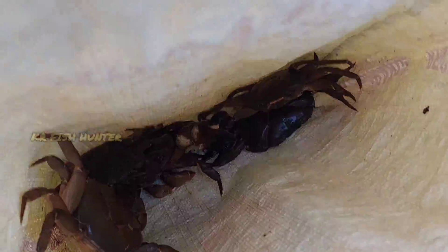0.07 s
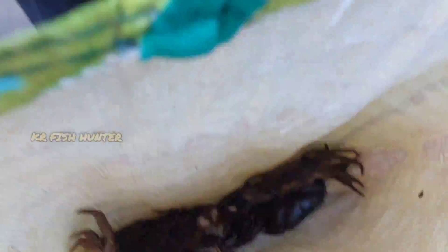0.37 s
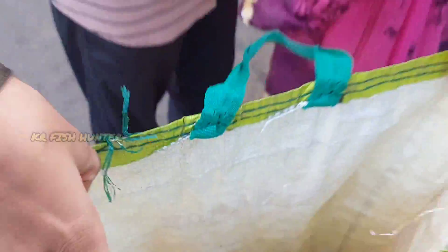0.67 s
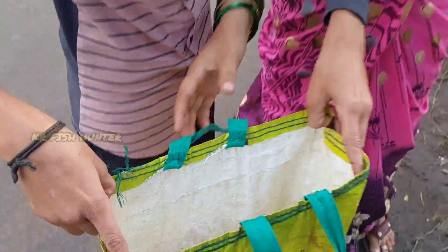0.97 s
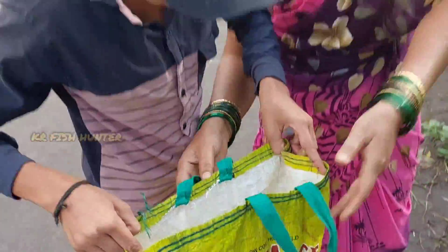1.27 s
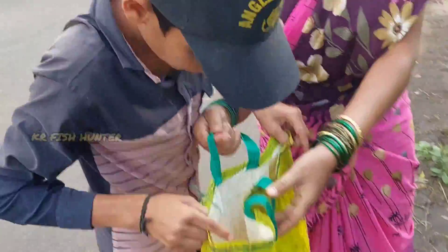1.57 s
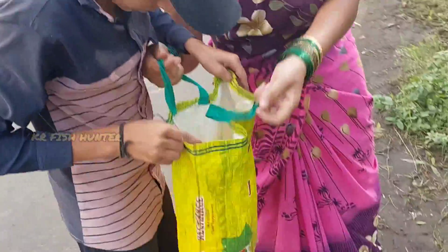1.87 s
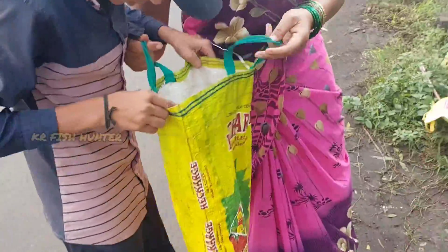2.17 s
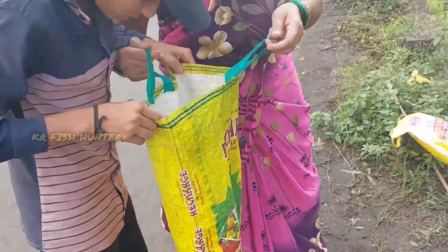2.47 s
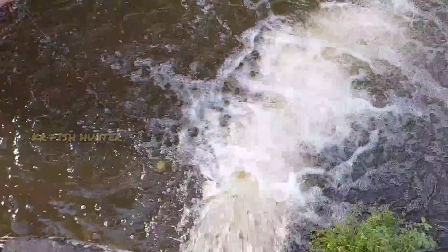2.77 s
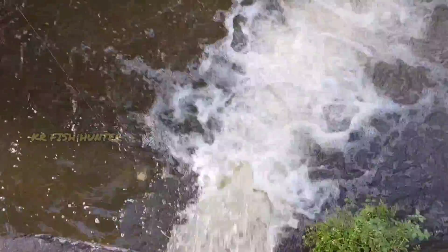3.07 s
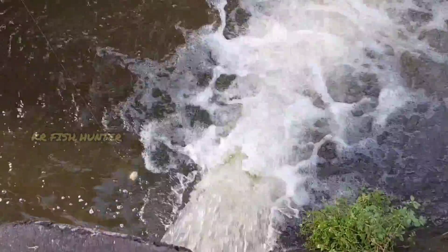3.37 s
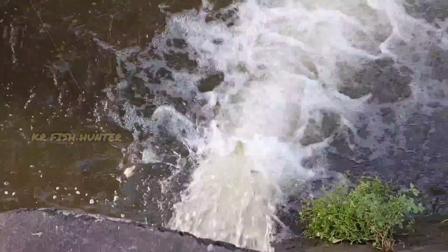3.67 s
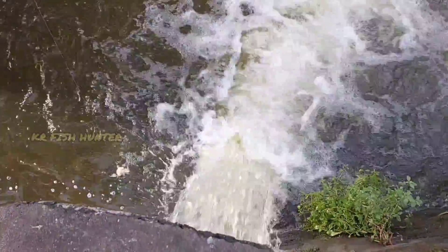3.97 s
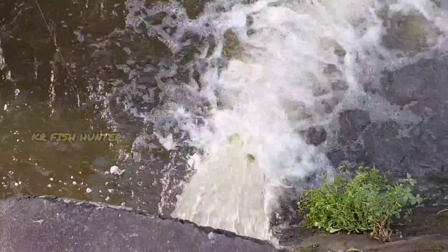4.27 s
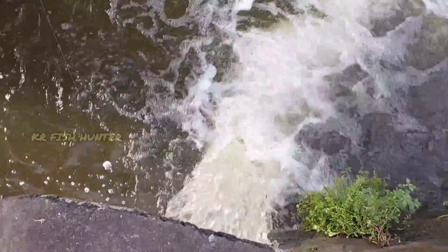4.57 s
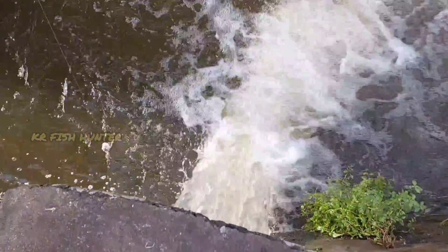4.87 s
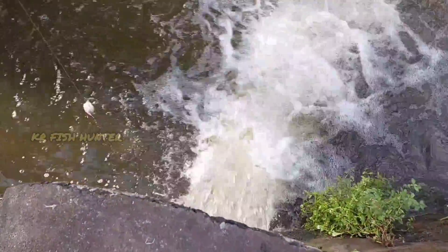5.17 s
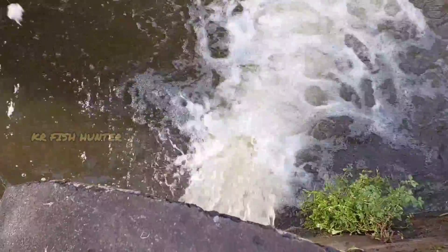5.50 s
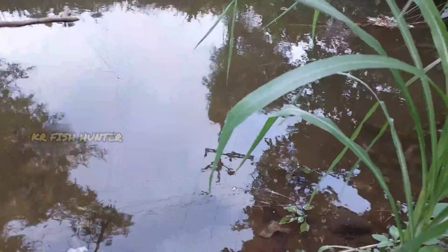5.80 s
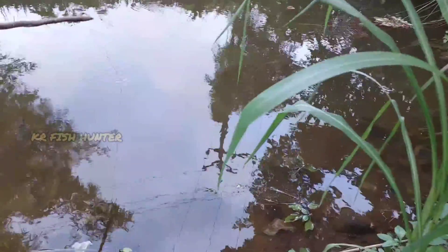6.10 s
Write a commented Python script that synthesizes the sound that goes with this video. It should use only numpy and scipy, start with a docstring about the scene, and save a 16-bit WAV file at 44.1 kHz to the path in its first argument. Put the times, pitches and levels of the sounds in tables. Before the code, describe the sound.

A woven plastic bag is handled with small snaps, a brief rustle and a few thin bangle clinks against a steady far-off rush. Suddenly a much louder stream of water plunges into a pool nearby, with gurgles, splashes and spray, and gusts buffet the microphone, mostly on the left. Finally the level drops to soft open air, a short grass swish and the faint, rapid chug of a distant engine.

```python
"""Outdoors, at three spots in turn. First, over a low distant rush, hands crinkle a woven plastic bag:
its stiff weave buckles in snaps, and glass bangles tick together. Then, close by, a thick jet gushes
from an outlet into a pool: trapped air booms, bubbles ring, spray hisses and wind thumps the microphone.
Last, a quiet pond, where grass brushes past and a far one-cylinder engine thuds out its exhaust."""
import sys
import numpy as np
from scipy import signal
from scipy.fft import rfft, irfft, next_fast_len
from scipy.io import wavfile
from scipy.ndimage import uniform_filter1d, map_coordinates

SR = 44100
rng = np.random.default_rng(int(sys.argv[2]) if len(sys.argv) > 2 else 0)


def dump_mix(stems):
    """Bounce the given channels to the path in sys.argv[1] as a 16-bit WAV at rate SR."""
    frames = np.atleast_2d(stems).T  # one column per channel
    limited = np.clip(frames, -1, 1)  # hard clip at full scale
    pcm = np.round(limited * 32767).astype(np.int16)
    wavfile.write(sys.argv[1], SR, pcm)


N = 279594

# how alike open air sounds at the two microphone ports: (frequency [Hz], likeness [0-1])
AIR_LIKENESS = [(50, 1), (140, 0.99), (600, 0.84), (1700, 0.72), (3500, 0.3), (7000, 0.073), (14000, .05)]
# the soft bed of air at the pond: (frequency [Hz], relative level [dB])
POND_TONE = [(20, -18), (90, 6), (180, 2.5), (350, -1), (650, -7.5), (1200, -11), (3200, -19.5),
             (6000, -19), (8300, -32), (12000, -28), (16000, -33)]
# a grass blade brushing past: (time [s], relative level [dB])
GRASS_BRUSHES = [(5.960, -42), (5.971, -42)]
# the thin swish of the blade: (frequency [Hz], relative level [dB])
GRASS_TONE = [(1200, -18), (2500, -8), (3900, -4), (4300, 1), (4800, -4), (8000, -20), (11500, -5),
              (16000, -12)]
# the breath of the engine's exhaust: (frequency [Hz], relative level [dB])
CHUFF_TONE = [(100, -20), (260, 0), (400, -2), (700, -14), (2000, -45)]

# the lows, mids and highs of the distant rush: (frequency [Hz], relative level [dB])
RUMBLE_TONE = [(20, -42), (60, -8.5), (88, -11.5), (140, 2), (180, -5), (230, -7), (300, -3), (420, -10.5),
               (620, -12), (850, -24.5), (2000, -45)]
WASH_TONE = [(300, -7), (900, 3), (1400, -0.5), (2200, -5.5), (3200, -15), (6000, -46)]
HISS_TONE = [(1200, -5), (3200, 1.5), (6300, 2), (8200, -9), (10000, -8), (12000, -3.5), (16000, -11.5)]
# the air resonating inside the open bag: (frequency [Hz], relative level [dB])
HOLLOW_TONE = [(180, -5), (275, 10), (400, -33), (560, 0), (670, 1.5), (850, -24), (1500, -32)]
# the bag's wall muffling the rumble: (frequency [Hz], gain [dB])
BAG_WALL_EQ = [(150, 0.5), (220, -3), (420, -3), (900, -6)]

# wind buffeting the microphone: (frequency [Hz], relative level [dB])
BUFFET_TONE = [(15, -44), (48, 11.5), (70, 0.5), (110, -1.5), (300, -9.5), (1000, -70)]
# the breeze freshening on the left port at the outlet: (time [s], level [dB])
WINDWARD_BREEZE = [(2.8, -44), (3.4, -36.5), (4.0, -29.5), (5.1, -29), (5.35, -30)]
# single gusts: (middle [s], length [s], left level [dB], right level [dB])
WIND_GUSTS = [(0.146, .14, -29, -30), (1.85, 0.96, -38.5, -35), (2.91, 0.085, -26, -42),
              (4.406, 0.1, -21, -55), (4.716, 0.1, -22, -26), (5.46, 0.1, -13.5, -36),
              (5.566, .26, -14.5, -20)]

# the bag's weave buckling: (time [s], relative snap level [dB], relative tick level [dB])
BAG_CRINKLES = [(0.5093, -40, -50), (1.565, -36, -36.5), (1.6246, -36.5, -42), (1.737, -32.5, -35),
                (1.863, -42, -50), (1.989, -37, -55), (2.107, -35, -60), (2.219, -41, -36),
                (2.457, -33.5, -44), (2.5503, -33.5, -43)]
# a crinkle's snap and the crisp tick on top: (frequency [Hz], relative level [dB])
SNAP_TONE = [(300, 6), (900, 5.5), (1600, 4), (3500, -4), (5500, -7.5), (8500, -36)]
TICK_TONE = [(2000, -19), (4000, 3), (6000, 0), (8300, -9), (12000, -6), (16000, -6)]
# the weave rustling as the bag's mouth is pulled shut: (middle [s], length [s], level [dB])
BAG_RUSTLES = [(1.73, 0.16, -38)]
# glass bangles touching: (time [s], relative level [dB])
BANGLE_TAPS = [(.55, -44), (.77, -45), (1.325, -37), (1.347, -41), (2.615, -41), (2.638, -42)]
# the thin ring of the glass: (frequency [Hz], relative level [dB])
GLASS_TONE = [(10000, -45), (11450, -14), (11750, -8), (12100, -12), (14000, -35)]

# air pockets booming in the pool, and spray landing on it: (frequency [Hz], relative level [dB])
PLUNGE_TONE = [(25, -54), (60, -4), (90, -10), (132, 3), (175, -5), (230, -6), (305, -1.5), (400, -11),
               (520, -5.5), (670, -11), (850, -9), (1300, -14), (2000, -17), (4000, -34.5)]
SPRAY_TONE = [(700, -15), (1800, 0.5), (3000, 0.5), (5500, 0.5), (6800, -3.5), (8200, -11), (10000, -9),
              (12500, -7), (16000, -17.5)]
# lumps of water slapping the pool: (time [s], level [dB])
WATER_SLAPS = [(3.389, -28), (3.7369, -24), (4.0274, -24), (4.8434, -23.5), (4.9711, -20), (4.9814, -20),
               (5.236, -24)]
# the smack of one lump: (frequency [Hz], relative level [dB])
SLAP_TONE = [(300, -21), (1200, -1), (2600, -6), (4500, -7), (9000, -24), (16000, -24)]
# how alike the jet sounds at the two ports: (frequency [Hz], likeness [0-1])
JET_LIKENESS = [(50, 0.58), (140, 1), (350, 1), (1000, 0.71), (2200, 0.56), (4000, 0.58), (6500, 0.51),
                (10000, 0.18), (15000, .1)]
# the right port ringing in two broad bands: (frequency [Hz], gain [dB])
PORT_RING_EQ = [(100, -0.5), (600, 1), (1600, -1), (2700, -3), (4100, 5.5), (5200, 5.5), (6200, 0.5),
                (8800, 3.5), (11600, 14), (16000, 9.5)]
# how much of that ring is heard as the hand cupped over the port shifts: (time [s], share [0-1])
PORT_RING_MIX = [(2.8, 0.8), (3.05, 1), (5.2, 1), (5.45, 0.82)]

# when each spot is heard: (start [s], end [s])
AT_BAG, AT_OUTLET, AT_POND = (-.01, 2.733), (2.781, 5.666), (5.668, 6.4)


def amp(db):
    """Decibels to gain."""
    return 10 ** (np.asarray(db) / 20)


def unit(x):
    """Scaled to rms 1."""
    return x / np.sqrt(np.mean(x ** 2) + 1e-20)


def along(points, hz):
    """Reads (frequency [Hz], value) points on a log axis."""
    f, v = np.transpose(points)
    return np.interp(np.log(hz + 1), np.log(f + 1), v)


def automation(points):
    """A fader ride through (time [s], value) points."""
    return np.interp(np.arange(N) / SR, *np.transpose(points))


def ramp(start_s, end_s):
    """A straight rise from 0 to 1."""
    return automation([(start_s, 0), (end_s, 1)])


def gate(span, fade_s):
    """Open over (start [s], end [s]), with a fade at each edge."""
    t = np.arange(N) / SR
    return np.clip(np.minimum(t - span[0], span[1] - t) / fade_s + .5, 0, 1)


def swells(rows):
    """An envelope of smooth arches: (middle [s], length [s], level [dB])."""
    t = np.arange(N) / SR
    return sum(amp(db) * np.cos(np.pi * np.clip((t - s) / length, -.5, .5)) ** 2
               for s, length, db in rows)


def wobble(rate):
    """A smooth random curve with rate points a second."""
    return map_coordinates(rng.standard_normal(int(N * rate / SR) + 4), [np.arange(N) * rate / SR])


def filtered(x, response):
    """x through a gain given as a function of frequency."""
    size = next_fast_len(N + SR // 4, real=True)
    return irfft(rfft(x, size) * response(np.fft.rfftfreq(size, 1 / SR)), size)[..., :N]


def eq(x, tone):
    """x through an EQ curve: (frequency [Hz], gain [dB])."""
    return filtered(x, lambda hz: amp(along(tone, hz)))


def noise(patchy_db):
    """Two white noises sharing patches of random gain in time and frequency."""
    spectra = signal.stft(rng.standard_normal((2, N)), nperseg=512)[2]
    patches = uniform_filter1d(rng.standard_normal(spectra.shape[1:]), size=6, axis=0)
    patches = unit(uniform_filter1d(patches, size=8, axis=1))
    return unit(signal.istft(spectra * amp(patchy_db * patches), nperseg=512)[1][:, :N])


def at_ports(pair, likeness, lag_ms):
    """Two unrelated signals become one wide source of rms 1 that reaches the left port later."""
    size = next_fast_len(N + SR // 4, real=True)
    hz = np.fft.rfftfreq(size, 1 / SR)
    width = np.arccos(np.clip(along(likeness, hz), -1, 1)) / 2
    mid, side = rfft(pair, size) * [np.cos(width), np.sin(width)]
    half_delay = np.exp(-1j * np.pi * hz * lag_ms / 1000)
    ports = np.array([(mid + side) * half_delay, (mid - side) / half_delay])
    return unit(irfft(ports, size)[:, :N])


def bursts(hits, tone, attack_s, t60_s):
    """Stereo puffs of shaped noise that swell and die, one per (time [s], level [dB])."""
    t = np.arange(SR // 4) / SR
    shape = (1 - np.exp(-t / attack_s)) * amp(-60 * t / t60_s)
    envelope = np.zeros(N + SR)
    for s, db in hits:
        envelope[round(s * SR):][:len(t)] += amp(db) * shape / shape.max()
    return envelope[:N] * unit(eq(rng.standard_normal((2, N)), tone))


def clicks(rate, spread_db):
    """Two streams of tiny impacts of uneven size."""
    count = int(rate * N / SR)
    sizes = amp(spread_db * np.clip(rng.standard_normal((2, count)), -2, 2))
    sizes *= rng.choice([-1, 1], (2, count))
    return unit(np.array([np.bincount(rng.integers(0, N, count), row, N) for row in sizes]))


def air_bed(tone, patchy_db, lag_ms):
    """A bed of open-air noise, narrow in the lows and wide in the highs."""
    return at_ports(eq(noise(patchy_db), tone), AIR_LIKENESS, lag_ms)


def engine():
    """One far cylinder at an even speed: each firing puffs exhaust, then the silencer rings briefly."""
    first_s, firing_hz, jitter_s = 5.6923, 17.16, 0.00079
    puff_hz, puff_width_s, delay_s = 185, 0.0029, 0.00513
    ring_hz, ring_t60_s = 178, 0.16
    firings = [(s + jitter_s * rng.standard_normal(), -33.5 + 2 * rng.standard_normal())
               for s in np.arange(first_s, N / SR, 1 / firing_hz)]
    t = np.arange(N) / SR
    thuds = np.zeros(N)
    for s, db in firings:
        age = t - s - delay_s
        puff = np.exp(-(age / puff_width_s) ** 2 / 2) * np.cos(2 * np.pi * puff_hz * age)
        ring = np.sin(2 * np.pi * ring_hz * age) * amp(-60 * np.abs(age) / ring_t60_s) * (age > 0)
        thuds += amp(db) * (puff + amp(-6) * ring)
    chuff = bursts(firings, CHUFF_TONE, attack_s=.004, t60_s=.08)
    return thuds + amp(-19.5) * chuff


def pond():
    """Soft open air, and a grass blade brushing past on the right."""
    air = air_bed(POND_TONE, patchy_db=0.5, lag_ms=0.41)
    grass = bursts(GRASS_BRUSHES, GRASS_TONE, attack_s=.006, t60_s=0.04)
    return amp(-48) * air + amp([[-13], [-4]]) * grass


def distant_rush():
    """Churning rumble, wash and thin hiss far to the right, heard at first from the bag's hollow mouth."""
    outside = ramp(.58, .92)  # the microphone backs out of the bag
    screened = 1 - ramp(1.12, 1.72)  # then clear of the people who screen it
    rumble = air_bed(RUMBLE_TONE, patchy_db=1.66, lag_ms=0.37)
    rumble = outside * rumble + (1 - outside) * eq(rumble, BAG_WALL_EQ)
    wash = air_bed(WASH_TONE, patchy_db=1.65, lag_ms=0.43)
    hiss = air_bed(HISS_TONE, patchy_db=2.0, lag_ms=0.455)
    hollow = air_bed(HOLLOW_TONE, patchy_db=-0.1, lag_ms=0.28)
    return (amp(-30 - 0.6 * wobble(rate=14)) * rumble
            + amp(-35.5 - 4.5 * screened) * wash
            + amp(-44.5 - 1.6 * screened) * hiss
            + amp(-34.5 - 16 * outside) * hollow)


def wind(left_db, right_db):
    """A breeze fluttering with turbulence and single gusts thump each port separately."""
    breeze = np.array([amp(db + 3 * wobble(rate=13)) for db in (left_db, right_db)])
    gusts = np.array([swells([(s, length, db) for s, length, db, _ in WIND_GUSTS]),
                      swells([(s, length, db) for s, length, _, db in WIND_GUSTS])])
    return unit(eq(rng.standard_normal((2, N)), BUFFET_TONE)) * np.hypot(breeze, gusts)


def bangles():
    """Glass touches glass with a high, thin ring."""
    return amp(-7.5) * bursts(BANGLE_TAPS, GLASS_TONE, attack_s=.002, t60_s=.09)


def bag():
    """The stiff weave buckles in grainy snaps as it is handled, and rustles as it is pulled shut."""
    start_s, end_s, faint_per_s = 1.5, 2.7, 10  # faint crinkles fall at random in this stretch
    count = int(faint_per_s * (end_s - start_s))
    faint = [(start_s + when * (end_s - start_s), -39.5 + 2 * (2 * size - 1))
             for when, size in rng.random((count, 2))]
    buckles = [(s, db) for s, db, _ in BAG_CRINKLES] + faint
    tails = bursts(buckles, SNAP_TONE, attack_s=0.0015, t60_s=0.057)
    cracks = bursts(buckles, SNAP_TONE, attack_s=0.00091, t60_s=0.0087)
    ticks = bursts([(s, db) for s, _, db in BAG_CRINKLES], TICK_TONE, attack_s=.001, t60_s=0.03)
    creases = clicks(rate=1500, spread_db=7)
    rustle = unit(eq(creases, SNAP_TONE)) + amp(-12) * unit(eq(creases, TICK_TONE))
    grain = amp(1.3 * wobble(rate=500))
    return (amp(5) * cracks + amp(1) * tails + ticks) * grain + swells(BAG_RUSTLES) * rustle


def bubbles(rate, centre_hz, octaves, cycles, spread_db, rise):
    """Two streams of bubbles; each rings for some cycles and climbs in pitch as it nears the surface."""
    count = int(rate * N / SR)
    n = np.arange(int(2 * SR * cycles / centre_hz))
    streams = []
    for _ in range(2):
        pitch, size = np.clip(rng.standard_normal((count, 2)), -2, 2).T[:, :, None]
        hz = centre_hz * 2 ** (octaves * pitch)
        age = (hz / SR / cycles).astype(np.float32) * n.astype(np.float32)  # in lifetimes
        ring = np.sin(2 * np.pi * cycles * age * (1 + rise * age / 2))
        ring *= np.minimum(20 * age, 1) * np.exp(-np.pi * age)
        ring *= np.minimum(2 * (1 - n / len(n)), 1)  # each ring fades smoothly to nothing at its end
        ring *= amp(spread_db * size) * np.sqrt(centre_hz / hz)  # big bubbles are louder
        starts = rng.integers(0, N, (count, 1))
        streams.append(unit(np.bincount((starts + n).ravel(), ring.ravel(), N)[:N]))
    return np.array(streams)


def patter(rate, spread_db, t60_s):
    """An envelope that jumps at random splashes and sinks between them."""
    count = int(rate * N / SR)
    power = amp(spread_db * np.clip(rng.standard_normal(count), -2, 2)) ** 2
    splashes = np.bincount(rng.integers(0, N, count), power, N)
    decay = amp(-60 / (t60_s * SR)) ** 2
    return unit(np.sqrt(signal.lfilter([1], [1, -decay], splashes)))


def spray(surge):
    """Drops fall back in clumps over a sheet of hiss, and tiny bubbles fizz."""
    drops = noise(patchy_db=0.5) + amp(-10) * clicks(rate=3000, spread_db=4)
    fizz = bubbles(rate=500, centre_hz=4016, octaves=0.807, cycles=34, spread_db=8.5, rise=0.044)
    sheet = unit(eq(noise(patchy_db=1.34), SPRAY_TONE))
    clumps = unit(eq(drops, SPRAY_TONE)) * patter(rate=180, spread_db=1.5, t60_s=0.044)
    water = sheet + amp(-2.5) * clumps + amp(-8) * fizz
    return at_ports(water, JET_LIKENESS, lag_ms=0.019) * amp(0.84 * surge)


def plunge(surge):
    """The jet drives air under water: a booming roar, a froth of bubbles and a few clear gurgles."""
    roar = unit(eq(noise(patchy_db=1.1), PLUNGE_TONE))
    froth = bubbles(rate=430, centre_hz=958, octaves=0.703, cycles=11.5, spread_db=6, rise=0.14)
    gurgles = bubbles(rate=55, centre_hz=787.3, octaves=0.737, cycles=35.3, spread_db=0, rise=0.09)
    water = roar + amp(-13.5) * froth + amp(-12.5) * gurgles
    return at_ports(water, JET_LIKENESS, lag_ms=.23) * amp(.5 * surge)


def gush():
    """A steady jet hits the pool, easing off as the microphone turns; the right port adds its ring."""
    age_s = np.maximum(np.arange(N) / SR - AT_OUTLET[0], 0)
    onset_db = -2.5 * np.exp(-age_s / 0.02)  # a quick swell to full level
    plunge_db = -22.5 - 0.66 * age_s + onset_db
    spray_db = -29.5 - 0.69 * age_s + onset_db
    surge = wobble(rate=35)  # the water arrives in lumps, shaking plunge and spray together
    slaps = bursts(WATER_SLAPS, SLAP_TONE, attack_s=0.00093, t60_s=0.023)
    left, right = amp(plunge_db) * plunge(surge) + amp(spray_db) * spray(surge) + slaps
    ring_mix = automation(PORT_RING_MIX)
    return np.array([left, (1 - ring_mix) * right + ring_mix * eq(right, PORT_RING_EQ)])


def scene():
    """The bag, the outlet and the pond, one after another."""
    at_bag = distant_rush() + bag() + bangles() + wind(left_db=-45.5, right_db=-45.5)
    at_outlet = gush() + wind(left_db=automation(WINDWARD_BREEZE), right_db=-40)  # right in the lee
    at_pond = pond() + engine()
    return (at_bag * gate(AT_BAG, fade_s=0.011)
            + at_outlet * gate(AT_OUTLET, fade_s=0.0037)
            + at_pond * gate(AT_POND, fade_s=0.003))


def record(dry):
    """A brick-wall low-pass at 16 kHz."""
    return filtered(dry, lambda hz: hz < 16000)


dry = scene()
out = record(dry)
dump_mix(out)
```